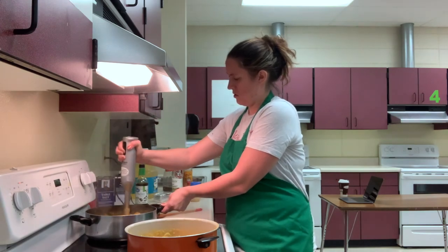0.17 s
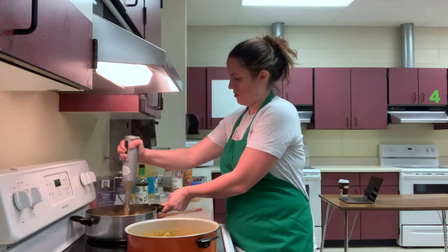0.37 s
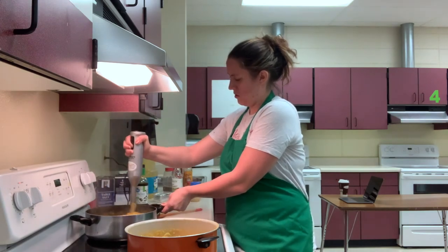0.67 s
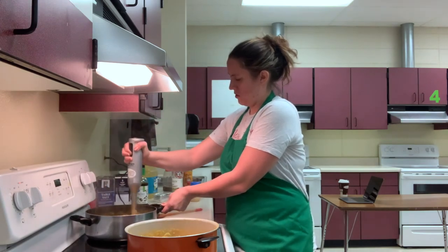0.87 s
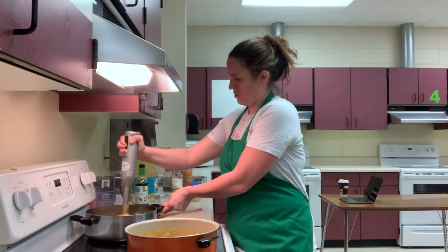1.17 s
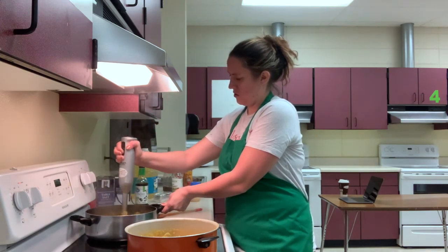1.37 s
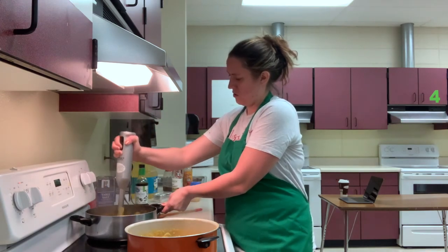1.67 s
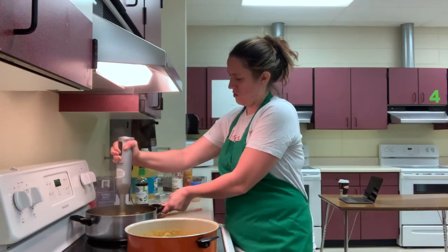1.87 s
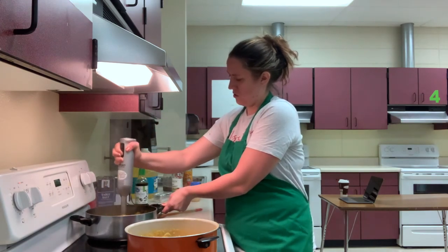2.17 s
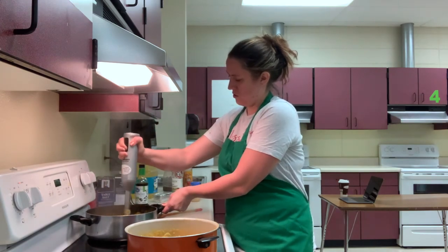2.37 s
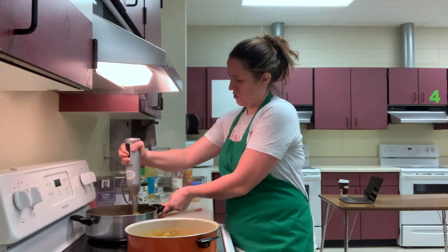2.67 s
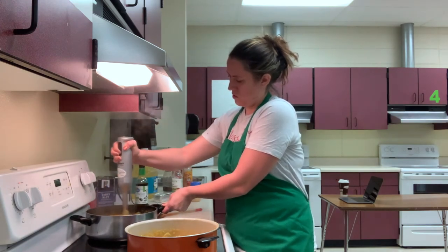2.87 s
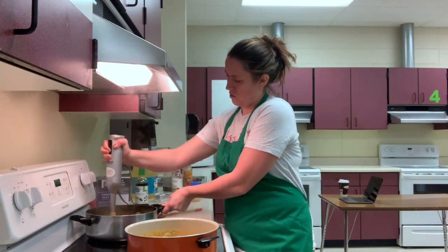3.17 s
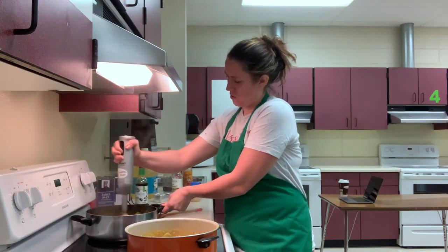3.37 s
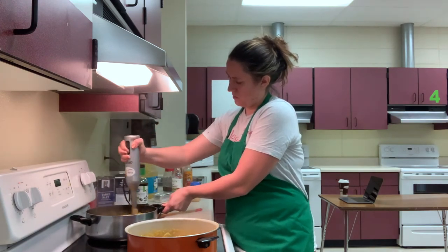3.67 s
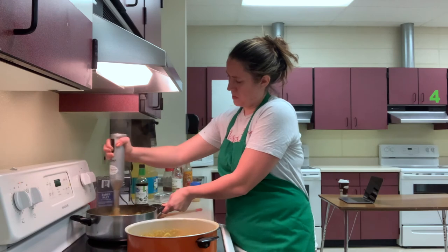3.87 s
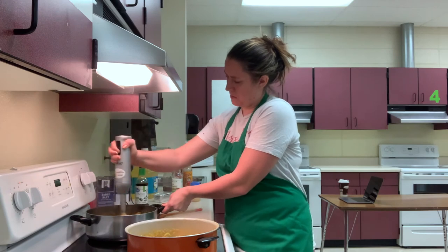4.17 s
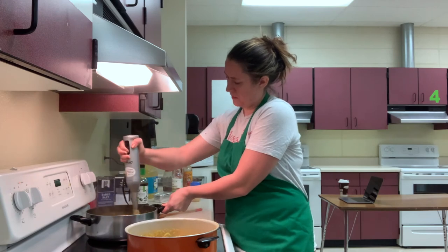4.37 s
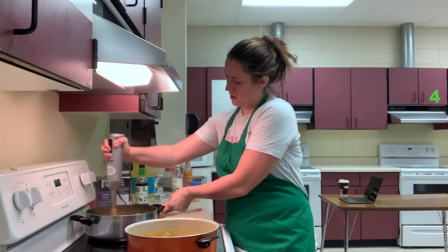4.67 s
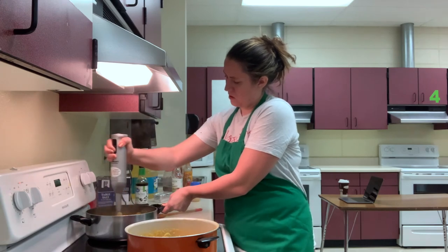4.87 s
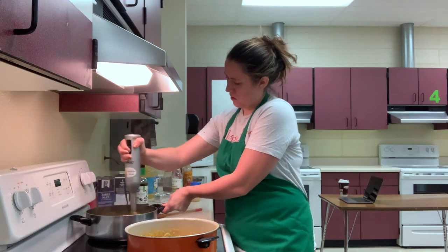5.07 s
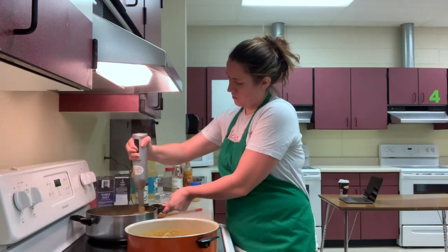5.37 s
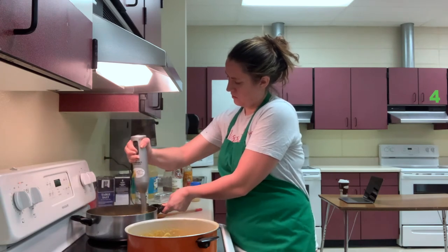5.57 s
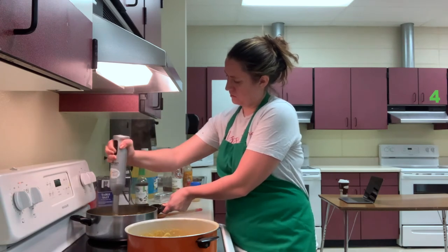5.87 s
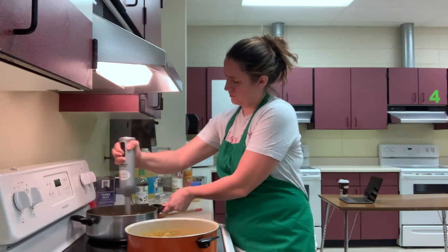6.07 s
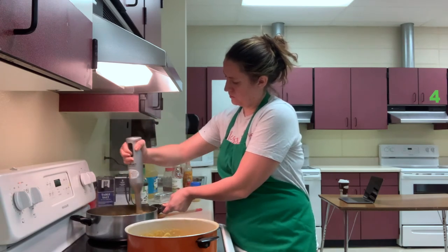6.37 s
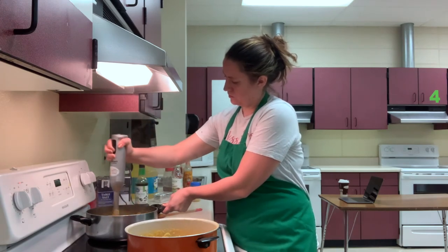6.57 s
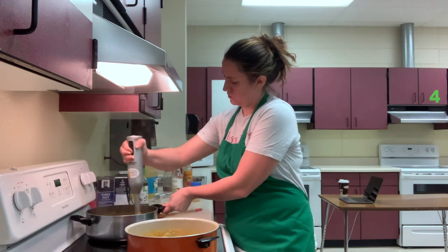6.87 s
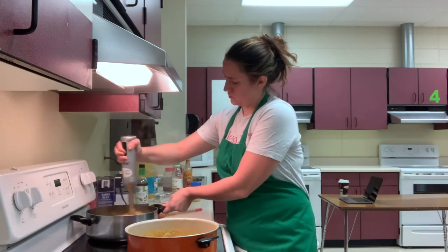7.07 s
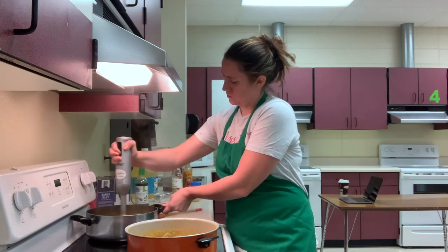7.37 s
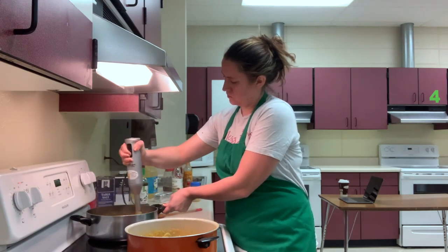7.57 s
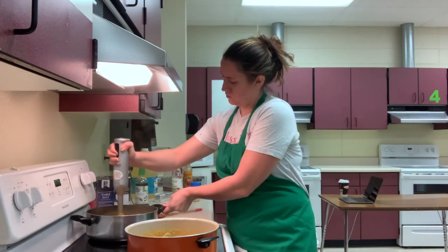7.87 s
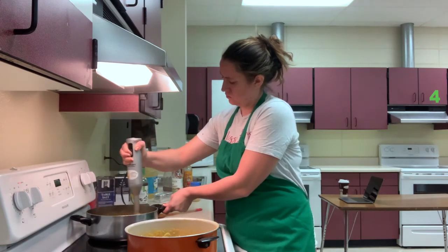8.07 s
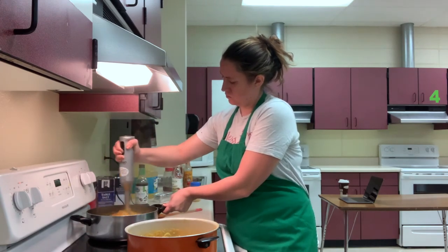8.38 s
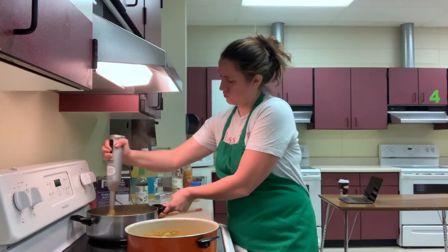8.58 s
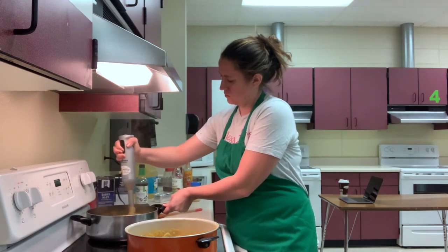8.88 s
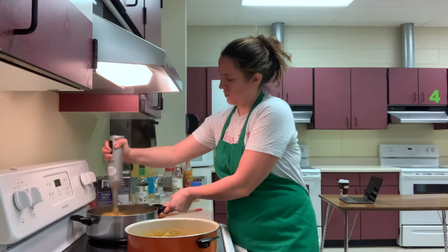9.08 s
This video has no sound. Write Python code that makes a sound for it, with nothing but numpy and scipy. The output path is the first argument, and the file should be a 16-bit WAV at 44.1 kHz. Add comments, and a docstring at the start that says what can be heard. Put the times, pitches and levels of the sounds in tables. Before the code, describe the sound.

A hand blender runs in a steel pot of thick soup, its rough motor hum wavering as chunks crunch and rattle the metal guard. Early on it is raised twice, racing to a cleaner, higher singing tone. It sags for a moment near two seconds and again near seven, each restart bringing a burst of hiss. Close stereo pickup in a kitchen.

```python
"""A hand blender runs in a steel pot of soup; the shaft hums in rough harmonics and soup churns and slaps throughout.
The blade, partly clear of the soup at first, is raised twice more within 1.8 s; free of load, it speeds up and sings.
The trigger opens at 1.9 s, the pitch falls, and the restart brings a burst of brush hiss; two thin whines follow.
At 7.1 s the trigger opens again; near 8 s the soup froths. Hit pieces crunch all along and ring the blade guard.
Brush hiss at twice the mains rate, resonant noise of the pot, a mains hum and a low thrum lie beneath."""
import sys
import numpy as np
from scipy import signal
from scipy.fft import rfft, irfft, next_fast_len
from scipy.io import wavfile
from scipy.ndimage import uniform_filter1d

SR = 44100
rng = np.random.default_rng(int(sys.argv[2]) if len(sys.argv) > 2 else 0)


def materialize(psi):
    """Save the field psi as 16-bit PCM at rate SR to the path in sys.argv[1].

    A 1-D psi becomes a single channel; in a 2-D psi each row is a channel.
    """
    bounded = np.clip(np.atleast_2d(psi).T, -1, 1)
    quanta = np.round(bounded * 32767).astype(np.int16)
    wavfile.write(sys.argv[1], SR, quanta)


N = 406602

# shaft under load: start_s, speed_hz (turns per second), second_order_db, fourth_order_db (guide levels)
SHAFT_LOAD = [(0.0, 167, -17, -45), (.27, 170, -33, -48), (.35, 171, -18, -51), (.39, 156, -33, -44),
              (0.43, 176, -25.5, -34), (0.87, 164, -23, -54), (1.09, 178, -24.5, -48),
              (1.16, 180, -33, -50), (1.32, 157, -23.5, -58), (1.39, 177, -14.5, -54),
              (1.45, 164, -30, -47), (1.52, 154, -22.5, -40), (1.85, 179, -21, -32.5),
              (2.25, 163, -20, -31.5), (2.8, 188, -22, -36.5), (3.57, 173, -21, -32), (4.2, 181, -23, -36),
              (4.5, 178.5, -19.5, -43), (5.3, 171, -24, -33), (5.5, 175, -17.5, -33),
              (6.0, 172.6, -18.5, -36.5), (6.75, 177.5, -21.5, -29), (7.4, 178, -20, -33),
              (7.75, 181, -22.5, -26.5), (8.0, 180, -22.5, -38), (8.2, 181, -18.5, -22.5),
              (8.32, 180, -21, -31), (8.45, 183, -22, -24.5), (8.72, 177, -26.5, -28),
              (8.85, 181, -27.5, -28.5), (9.22, 178, -23.5, -29.5)]
MAINS_HZ = 59.9
SLURP_LEAD_S = 0.12   # the guard slurps at the surface before the blade bites


def from_db(db):
    """Level to amplitude: 20 dB is a factor of ten."""
    return 10 ** (np.asarray(db) / 20)


def rms_one(x):
    """Normalisation: scale a signal to unit root mean square."""
    return x / np.sqrt(np.mean(x ** 2) + 1e-20)


def seconds():
    """Sampling: the time of every sample in seconds."""
    return np.arange(N) / SR


def in_time(rows):
    """Linear interpolation: each table column after the time becomes one value per sample."""
    s, *columns = np.transpose(rows)
    return [np.interp(seconds(), s, column) for column in columns]


def over_hz(points, size, axis=1):
    """Logarithmic frequency scale: interpolate one table column on an FFT grid."""
    points = np.array(points)
    hz = np.maximum(np.arange(size // 2 + 1) * SR / size, 1)
    return np.interp(np.log(hz), np.log(points[:, 0]), points[:, axis])


def coloured(x, spectrum):
    """Linear filtering: weight the spectrum of a signal in frequency, then scale to rms 1."""
    size = next_fast_len(N)
    weighted = rfft(x, size) * from_db(over_hz(spectrum, size))
    return rms_one(irfft(weighted, size)[:N])


def drift(rate_hz):
    """Low-pass filtered chance: a slow random curve of rms 1, computed at every 20th sample."""
    r = np.exp(-40 * np.pi * rate_hz / SR)
    chance = rng.standard_normal(N // 20 + 3002)
    slow = signal.lfilter([1], [1, -2 * r, r * r], chance)[3000:]   # the filter has settled by then
    return np.interp(np.arange(N) / 20, np.arange(len(slow)), rms_one(slow))


def resonance(x, hz, width_hz):
    """Damped oscillator: a two-pole peak with about unit gain on top."""
    r = np.exp(-np.pi * width_hz / SR)
    gain = (1 - r * r) / 2
    return signal.lfilter([gain, 0, -gain], [1, -2 * r * np.cos(2 * np.pi * hz / SR), r * r], x)


def narrow(shake, hz, width_hz):
    """Resonance in cascade: the drive passes one peak twice; rms 1."""
    return rms_one(resonance(resonance(shake, hz, width_hz), hz, width_hz))


def grains(per_s, spread_db):
    """Random impulse process: clicks of uneven size and sign at a mean rate."""
    sizes = from_db(spread_db * np.minimum(rng.exponential(1, N), 4)) * rng.choice([-1, 1], N)
    return sizes * (rng.random(N) < per_s / SR)


def swell(start, end, rise_s, fall_s):
    """Exponential envelope: rise up to start, hold at 1, fall after end; time constants in s."""
    t = seconds()
    return np.exp(np.minimum(0, np.minimum((t - start) / rise_s, (end - t) / fall_s)))


def coasting():
    """Rotational inertia: seconds of speed lost, won back on restart; open trigger and current surge, 0-1."""
    # open trigger: off_s, on_s
    releases = [(1.89, 2.124), (7.08, 7.266)]
    spin_up_s, inrush_s, contact_s = 0.03497, 0.081, .003   # two time constants; length of the switch ramp
    t, lost, idle, surge = seconds(), 0, 0, 0
    for off, on in releases:
        after_on = np.maximum(t - on, 0)
        lost = lost + np.clip(t - off, 0, on - off) * np.exp(-after_on / spin_up_s)
        idle = idle + (t > off) * np.clip(1 - (t - on) / contact_s, 0, 1)
        surge = surge + np.clip((t - on) / contact_s, 0, 1) * np.exp(-after_on / inrush_s)
    return lost, idle, surge


def lifted(lead_s=0):
    """Unloading by immersion depth: how far the blade is clear of the soup, 0-1."""
    # raised blade: start_s, end_s (back under), clear_share (0-1)
    lifts = [(-.1, 0.276, 0.37), (.47, 0.837, 0.66), (1.52, 1.773, .58)]
    raise_s, plunge_s = .11, 0.04977   # ramp lengths
    t, out = seconds(), 0
    for start, end, clear in lifts:
        ramps = np.minimum((t - start) / raise_s, (end - lead_s - t) / plunge_s)
        out = out + clear * np.clip(ramps, 0, 1)
    return out


def turning():
    """Phase is the integral of speed: it wavers under load, rises in air and falls while coasting."""
    # speed wavers less as the soup gets smoother: start_s, speed_share (rms)
    lumpiness = [(6.5, .011), (7.5, .007)]
    free_gain_hz, coast_hz_per_s = 39.77, 150   # gained if fully clear, lost while coasting
    clear = lifted()
    speed = in_time(SHAFT_LOAD)[0] + free_gain_hz * uniform_filter1d(clear, size=4000)
    speed = speed - coast_hz_per_s * coasting()[0]
    waver = in_time(lumpiness)[0] * drift(8.05) * (1 - clear)
    return 2 * np.pi * np.cumsum(speed * (1 + waver)) / SR


def low_end():
    """Structure-borne sound: a mains sine and a lumpy low noise thrum through the stove."""
    # weighting of the thrum noise: frequency_hz, level_db (relative)
    low_spectrum = [(24, -33), (38, 10.5), (50, 5.5), (80, 6.5), (130, 8), (220, 7.5), (400, -29)]
    # guard bears on the pot floor: peak_s, level_db (ahead of the 3 dB cut below)
    thrums = [(.15, -23.5), (.88, -17.5), (1.87, -21), (2.28, -24), (5.62, -27), (6.96, -31), (7.55, -31),
              (8.42, -24)]
    thrum = from_db(-32.5 - 19 * coasting()[0] - 6.2 * lifted())   # floor between the swells
    for s, db in thrums:
        thrum = thrum + from_db(db) * swell(s, s, 0.048, 0.034)
    hum = from_db(-35 + 3 * drift(5)) * np.sin(2 * np.pi * MAINS_HZ * seconds())
    return hum + from_db(-3.0) * thrum * coloured(rng.standard_normal(N), low_spectrum)


def froth():
    """Broad resonance of noise: one long, dull swell of fine bubbles."""
    shape = swell(7.87, 8.16, .07, .035)
    level = from_db(-27.5 + 1.9 * drift(16.0))
    return level * shape * narrow(rng.standard_normal(N), hz=2770, width_hz=2130)


def whistle():
    """Frequency glide: a thin, clean whine sinks a little while it lasts."""
    # thin whine: start_s, end_s, level_db (ahead of its drift)
    whistles = [(2.673, 2.829, -41.5), (2.984, 3.15, -41)]
    start_hz, sag_hz_per_s = 4392, 150
    out = 0
    for s, end, db in whistles:
        t = seconds() - s
        tone = np.sin(2 * np.pi * (start_hz - sag_hz_per_s * t / 2) * t)
        out = out + from_db(db + 1.5 * drift(14.8)) * swell(s, end, .015, .015) * tone
    return out


def motor():
    """Amplitude modulation: brush sparking swells twice per mains cycle; the housing rings in narrow whines."""
    # motor housing: start_s, hiss_db (relative), whine_db (main whine, ahead of its drift)
    motor_levels = [(0, -30.5, -29.5), (.22, -27, -43), (.32, -34.5, -42), (.72, -27, -36), (.85, -29, -39),
                    (1.85, -29.5, -32), (2.57, -32.5, -37), (3.26, -29, -38), (4.18, -30, -36.5),
                    (4.73, -28, -36), (5.2, -31.5, -34), (5.85, -28, -41), (6.1, -32, -37),
                    (7.0, -30.5, -37), (7.4, -33, -32.5), (8.25, -35.5, -40), (8.55, -32.5, -37),
                    (9.22, -36, -60)]
    # lesser whines: frequency_hz, width_hz, level_db (against the brush hiss, ahead of drift)
    whines = [(3413, 90, -26), (4395, 60, -29), (5406, 80, -27), (6700, 140, -22)]
    # weighting of the brush hiss: frequency_hz, level_db (relative)
    hiss_spectrum = [(4000, -17), (6000, -12), (7200, -12), (8000, -8.5), (8750, -.5), (9300, -2.5),
                     (10100, -2), (11400, -12.5), (13000, -11), (13600, -15), (15200, -12), (17000, -12)]
    hiss_db, whine_db = in_time(motor_levels)
    lost, idle, surge = coasting()
    hiss_db = hiss_db - 4 * idle - 32 * lost * idle + 9 * surge   # the starting current makes more hiss
    mains = 2 * np.pi * MAINS_HZ * seconds()
    sparks = 1 + 0.2 * np.cos(2 * mains) + 0.06 * np.cos(4 * mains)
    flicker, patchy = from_db(1.1 * drift(12)), from_db(2.5 * drift(4))
    crackle = rng.standard_normal(N) + .15 * grains(2700, spread_db=5)
    hiss = coloured(sparks * crackle, hiss_spectrum)
    shake = rng.standard_normal(N)
    ring = sum(from_db(db + 4.2 * drift(8.1)) * narrow(shake, hz, width) for hz, width, db in whines)
    whine_gain = from_db(whine_db + 2.0 * drift(5.1) - 90 * lost * idle)
    whine = whine_gain * sparks * narrow(shake, hz=3020, width_hz=170)
    return from_db(hiss_db + 3.5) * (flicker * hiss + patchy * ring) + whine


def guard(clicks_for):
    """Modal synthesis: each mode of the steel blade guard is rung by its own click train."""
    # guard modes: frequency_hz, level_db (relative), t60_s (fall by 60 dB)
    guard_modes = [(820, -2, .022), (1170, -1, .024), (1460, -1, .02), (1750, -2, .02), (2110, -2, .025),
                   (2560, -3, .018), (3450, -6, .02), (3800, -8, .018), (4730, -9, .016), (5400, -9, .016),
                   (5650, -11, .014), (6400, -11, .014)]
    out = 0
    for hz, level_db, t60 in guard_modes:
        r, w = from_db(-60 / (t60 * SR)), 2 * np.pi * hz / SR
        strike = [0, from_db(level_db) * np.sin(w)]
        out = out + signal.lfilter(strike, [1, -2 * r * np.cos(w), r * r], clicks_for(hz) + 1e-18)
    return out


def gurgles(low_hz, high_hz):
    """Bubble resonance: air pockets burst in clumps, each ringing briefly at one of 20 pitches; rms 1."""
    pops, dealt, out = grains(2500, spread_db=2.0), rng.integers(0, 20, N), 0
    for k, hz in enumerate(np.geomspace(low_hz, high_hz, 20)):
        clumps = from_db(4.5 * drift(6))
        out = out + narrow(pops * clumps * (dealt == k) + 1e-18, hz, width_hz=2.0 * hz / 45)
    return rms_one(out)


def soup_levels():
    """Amplitude addition: splashes stand on a flickering spray floor; churn and floor sink while coasting (dB)."""
    # churning of the soup: start_s, level_db (relative)
    churning = [(0, -13), (.22, -23), (.32, -27.5), (.85, -22.5), (1, -25.5), (1.82, -24), (2.2, -18.5),
                (2.45, -26.5), (3.3, -24), (3.95, -23), (4.35, -24.5), (4.95, -21.5), (5.35, -26),
                (6.35, -23.5), (6.85, -24), (7.02, -24.5), (7.35, -19.5), (7.7, -22), (8.07, -20.5),
                (8.33, -24), (9.22, -22)]
    # soup slaps out of the guard: start_s, length_s, level_db (relative)
    splashes = [(0.169, 0.082, -21.5), (0.71, 0.045, -25), (0.778, 0.08, -31.5), (1.175, 0.054, -25),
                (1.664, 0.057, -24), (1.742, 0.052, -23.5), (1.79, 0.055, -28), (2.368, 0.084, -25),
                (3.152, 0.036, -23.5), (3.935, 0.046, -26), (3.981, 0.044, -27), (4.036, 0.03, -29.5),
                (4.278, 0.047, -29), (4.527, 0.03, -28), (4.965, 0.033, -24), (5.006, 0.018, -29),
                (5.082, 0.04, -24), (6.27, 0.027, -26.5), (6.349, 0.042, -24.5), (6.838, 0.027, -23),
                (6.947, 0.11, -21.5), (8.872, 0.037, -26), (8.975, 0.057, -23), (9.175, 0.042, -33)]
    lost = coasting()[0]
    churn_db = in_time(churning)[0] - 23 * lifted(SLURP_LEAD_S) - 84 * lost
    spray = from_db(-43 + 6.5 * drift(3.6) - 104 * lost)
    for s, length, db in splashes:
        edge = 0.18 * length   # longer slaps have softer edges
        spray = spray + from_db(db) * swell(s + edge, s + length - edge, 0.0062 + edge, 0.0031 + edge)
    return churn_db, 20 * np.log10(spray)


def soup(turn, second_db):
    """Turbulent noise excitation: soup pulses with the blade, drives the pot, sprays and pelts the guard."""
    # pot full of soup: frequency_hz, width_hz, level_db (relative)
    pot_modes = [(302.8, 64, -2.5), (329.7, 43, 0.5), (531.6, 49, -4), (660.5, 77, -3), (836, 65, -8.5),
                 (1120, 120, -8.5), (1575, 57, -16.5), (1918, 78, -7)]
    # weighting of the churn noise: frequency_hz, level_db (relative)
    churn_spectrum = [(100, -50), (250, -3.5), (450, -6), (900, -4), (1500, -7), (2400, -6), (2800, -18),
                      (3600, -21), (5000, -76)]
    # weighting of the spray noise: frequency_hz, level_db (relative)
    spray_spectrum = [(1500, 8.5), (2500, 19.5), (3500, 6), (4200, -27), (5500, 6), (6800, -0.5),
                      (7600, -63), (10000, 0), (15000, -8)]
    deep_lift_db = -15 * lifted()   # the deep part of the churn needs the blade well under
    churn_db, spray_db = soup_levels()
    slosh_db, spatter_db = 1.7 * drift(18), 2.6 * drift(35)

    churn = coloured((1 + 0.13 * np.cos(turn)) * rng.standard_normal(N), churn_spectrum)
    deep = signal.sosfilt(signal.butter(2, 750, fs=SR, output="sos"), churn)
    churn = churn - deep * (1 - from_db(deep_lift_db))
    churn = churn + from_db(-.5 + deep_lift_db / 2) * gurgles(452.1, 2402)

    push = rng.standard_normal(N)
    pot = rms_one(sum(from_db(db) * narrow(push, hz, width) for hz, width, db in pot_modes))

    spray = coloured(rng.standard_normal(N) + .5 * grains(600, spread_db=7.0), spray_spectrum)
    spray = spray + from_db(-3.5) * gurgles(2290, 6870)

    bits = grains(1500, spread_db=2.5)
    pelt = rms_one(guard(lambda hz: bits * (rng.random(N) < .25)))   # each mode takes a random quarter

    out = from_db(churn_db + slosh_db) * churn
    out = out + from_db(0.55 * second_db + 0.43 * churn_db + 0.5) * pot
    out = out + from_db(spray_db + spatter_db) * spray
    return out + from_db(0.77 * spray_db + 0.37 * churn_db - 2.0) * pelt


def chops():
    """Impact excitation: each hit is a short gritty crush that strikes every guard mode with its own strength."""
    # pieces hit by the blade: start_s, level_db (relative), pitch_hz (near which the guard rings most)
    pieces = [(0.183, -19, 3200), (0.226, -8.5, 1500), (0.441, -5.5, 1230), (0.779, -8, 1100),
              (.803, -10, 1450), (0.829, -11, 2680), (1.141, -9.5, 4100), (1.521, -5.5, 955),
              (1.54, -14, 2510), (1.691, -10, 896.5), (1.71, -8.5, 1948), (1.746, -11, 2513),
              (2.375, -12, 3765), (2.393, -6, 3730), (2.538, -12.5, 1660), (3.945, -7, 5240),
              (3.995, -11, 2373), (4.044, -16, 3795), (4.184, -9, 2482), (4.285, -14, 3800),
              (4.295, -3.5, 2520), (4.539, -13, 3506), (5.018, -9, 2514), (5.027, -6, 3180),
              (5.087, -10, 2700), (5.412, -13, 2485), (6.36, -6, 2498), (6.371, -6, 3375),
              (6.942, -6.5, 1148), (6.964, -7, 1153), (7.003, -4, 2500), (8.874, -9, 4707),
              (8.924, -9, 2583), (8.986, -8, 3600)]
    s, hit_db, pitch = np.transpose(pieces)
    t = np.arange(int(0.042 * SR)) / SR
    shape = (len(s), len(t))
    grit = rng.standard_normal(shape) * (rng.random(shape) < .12)
    grit = grit * np.exp(-t / .0055) * (1 - np.exp(-t / .0003))
    grit = grit / np.sqrt(np.sum(grit ** 2, axis=1, keepdims=True))   # equal energy per hit
    where = np.minimum(np.round(s * SR).astype(int)[:, None] + np.arange(len(t)), N - 1)

    def clicks_for(hz):
        """Spectral selectivity: a mode gets 10.5 dB less per octave away from the pitch of a hit."""
        db = hit_db + 1.0 - 10.5 * np.abs(np.log2(hz / pitch)) + rng.normal(0, 3, len(s))
        return np.bincount(where.ravel(), (from_db(db)[:, None] * grit).ravel(), N)
    return guard(clicks_for)


def racing(turn):
    """Harmonic series: unloaded, the shaft sings in five clean orders."""
    order = np.arange(1, 6)[:, None]
    level_db = -30 - 40 * (1 - lifted(SLURP_LEAD_S / 2)) + 1.0 * (order > 1)
    tones = np.sin(order * turn + rng.uniform(0, 2 * np.pi, (5, 1)))
    return (from_db(level_db) * tones).sum(axis=0)


def shaft(turn):
    """Modulated harmonics: each order is a sine whose strength and phase wobble as lumps load the blade."""
    # shaft orders: multiple, level_db (against its guide level), fourth_share (0-1), wobble_hz, roughness
    shaft_orders = [(1, -8.5, 0.1, 11.95, 1.086), (2, 3.5, 0.01, 12.4, 0.53), (3, -1, .6, 17, 0.83),
                    (4, 7, .99, 12, 0.34), (5, -6.5, .9, 13, .7)]
    # single orders swell for a moment: peak_s, multiple, level_db
    order_swells = [(2.27, 1, -22), (3.7, 3, -19), (7.52, 1, -23), (7.77, 3, -14.5), (8.36, 1, -21),
                    (8.4, 3, -19), (8.75, 5, -20), (8.91, 3, -15.5)]
    second_db, fourth_db = in_time(SHAFT_LOAD)[1:]
    lost, clear, out = coasting()[0], lifted(), 0
    second_db = second_db - 45 * clear - 98 * lost
    fourth_db = fourth_db - 14 * clear - 140 * lost
    for multiple, level_db, share, wobble_hz, rough in shaft_orders:
        wobble = drift(wobble_hz) + 1j * drift(wobble_hz)
        lumps = (1 + rough * wobble) / np.sqrt(1 + 2 * rough ** 2)   # mean power kept
        guide_db = (1 - share) * second_db + share * fourth_db
        gain = from_db(level_db + guide_db + 1.8 * drift(3))
        out = out + gain * np.real(lumps * np.exp(1j * (multiple * turn + 2 * drift(1))))
    for s, multiple, db in order_swells:
        tone = np.sin(multiple * turn + rng.uniform(0, 2 * np.pi))
        out = out + from_db(db) * swell(s, s, 0.081, 0.081) * tone
    return out, second_db


def blender(turn):
    """Superposition: all that the blender and the stove give off, drawn afresh on each call."""
    hum, second_db = shaft(turn)
    background = low_end() + froth() + whistle() + motor()
    return background + soup(turn, second_db) + chops() + racing(turn) + hum


def microphone_pair(direct, scattered):
    """Interchannel coherence: both sides share direct sound, phase-shifted; scattered sound has opposite signs."""
    # likeness of the sides: frequency_hz, coherence (0-1), right_lead_rad
    pair = [(30, .98, 0), (200, .93, -.1), (330, .8, -.5), (500, .7, -1.2), (900, .7, -1.6),
            (1300, .55, -1.4), (1900, .55, -2.9), (2400, .65, -3.4), (2750, .15, -3), (3030, .75, -3.2),
            (3300, .45, -4.2), (3900, .4, -5.4), (4700, .35, -4.4), (6600, .55, -4.3), (7400, .999, -3.14),
            (8700, .999, -3.14), (9400, .83, -2.6), (10400, .82, -1.7), (10900, .63, -1), (11400, .98, 0),
            (13400, .99, 0), (14300, .47, .9), (15100, .8, 2.7), (15700, .98, 3.1)]
    # level difference: frequency_hz, left_minus_right_db
    tilt = [(30, 2.2), (100, 2.5), (400, -2.5), (750, -.5), (1150, 4), (2100, 0), (2700, 2), (3600, -.5),
            (5500, 1), (7800, 0)]
    size = next_fast_len(N + SR // 10)
    alike, lead = np.clip(over_hz(pair, size), 0, 1), over_hz(pair, size, axis=2)
    side = np.array([[1], [-1]]) / 2   # left, right
    shared = np.sqrt((1 + alike) / 2) * rfft(direct, size)
    opposed = np.sqrt((1 - alike) * 2) * side * rfft(scattered, size)
    balance = np.exp(-1j * side * lead) * from_db(side * over_hz(tilt, size))
    return irfft((shared + opposed) * balance, size)[:, :N]


def scene():
    """Diffuse scattering: sound from walls and cupboards follows the same motion but differs in fine detail."""
    turn = turning()
    return microphone_pair(blender(turn), blender(turn))


def record(dry):
    """Soft saturation and band limiting: peaks are rounded, the top is cut steeply above 15750 Hz."""
    rounded = 1.1 * np.tanh(dry / 1.1)
    return signal.sosfilt(signal.ellip(12, .5, 70, 15750, fs=SR, output="sos"), rounded)


dry = scene()
out = record(dry)
materialize(out)
```